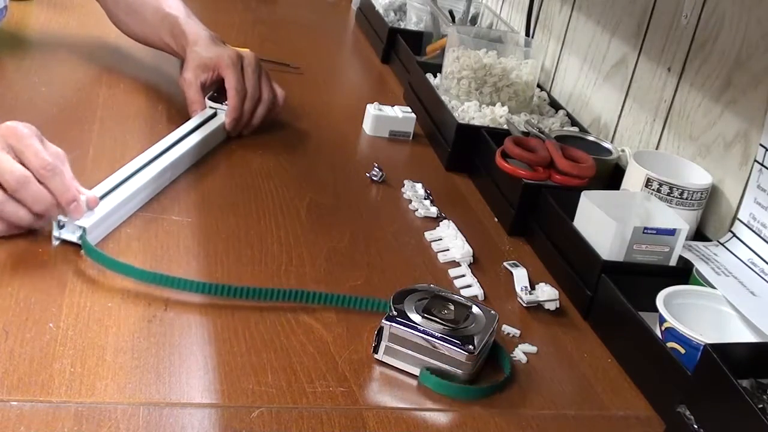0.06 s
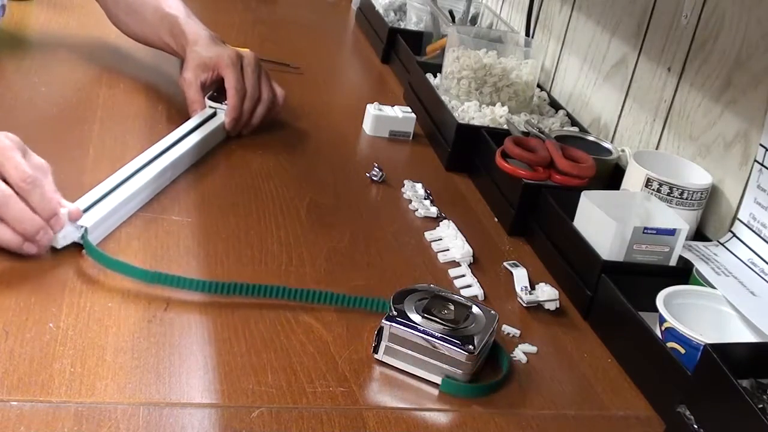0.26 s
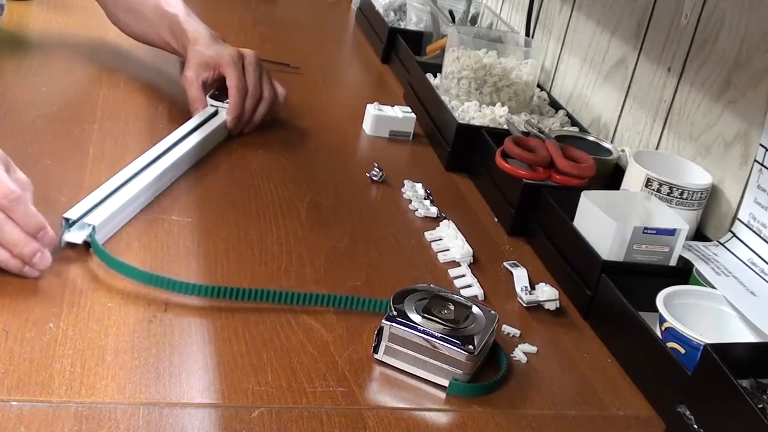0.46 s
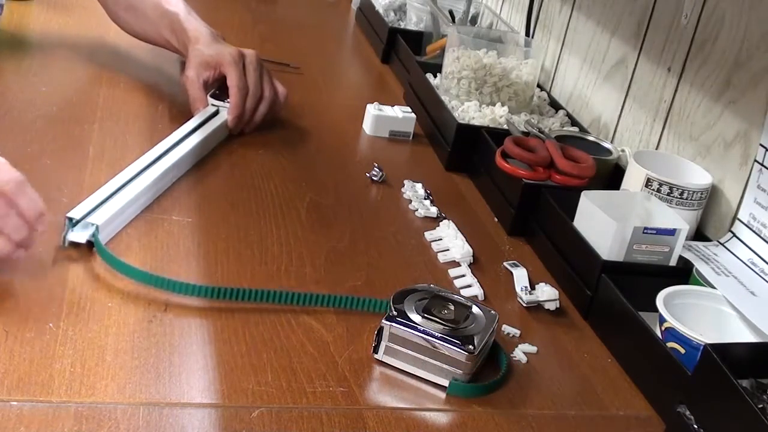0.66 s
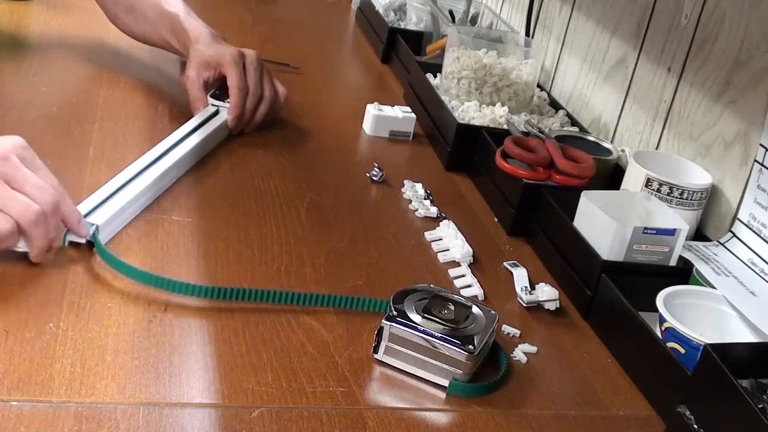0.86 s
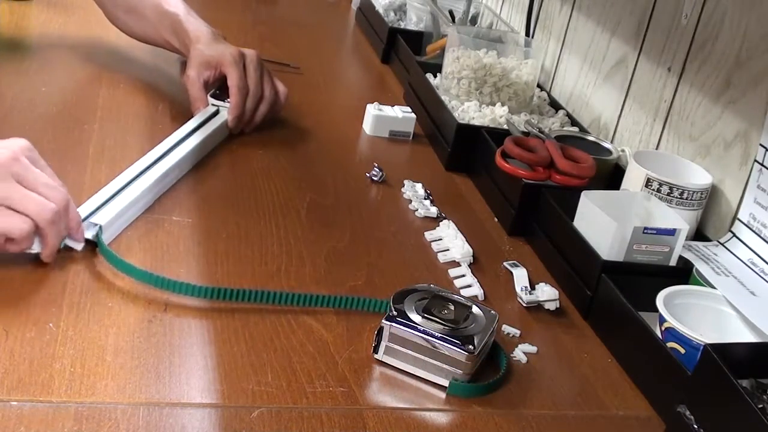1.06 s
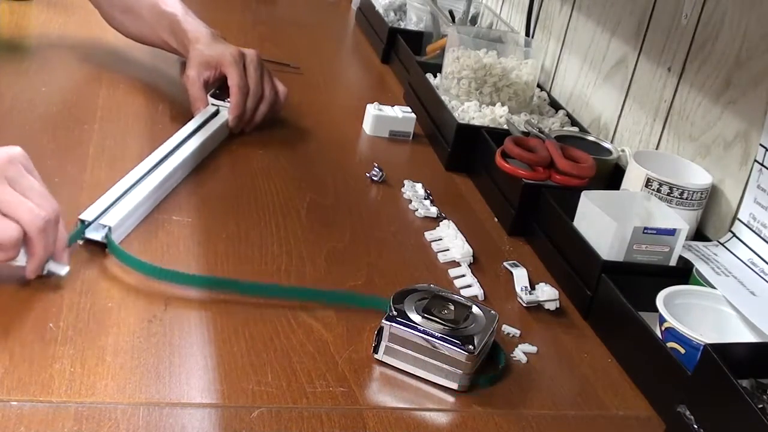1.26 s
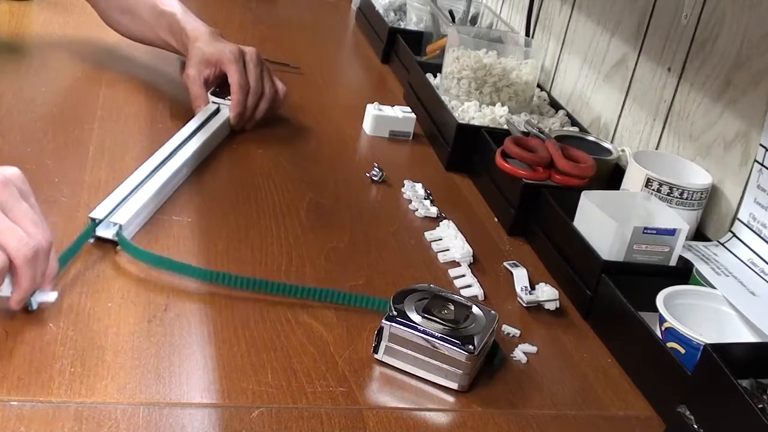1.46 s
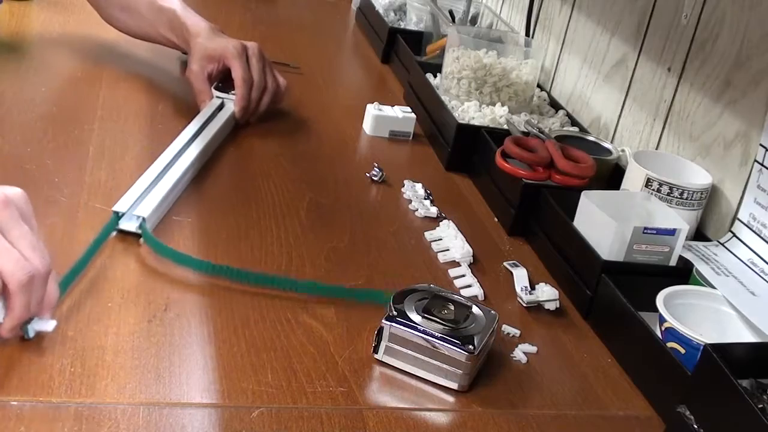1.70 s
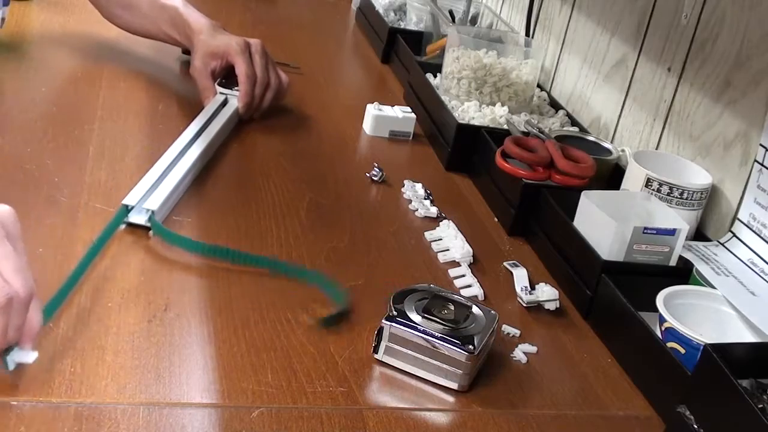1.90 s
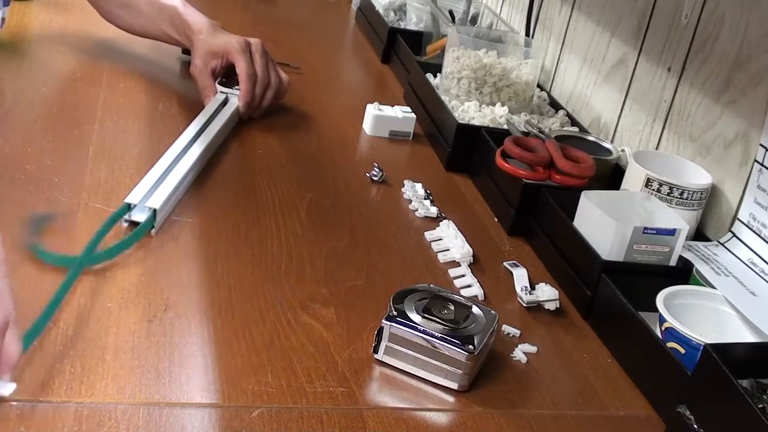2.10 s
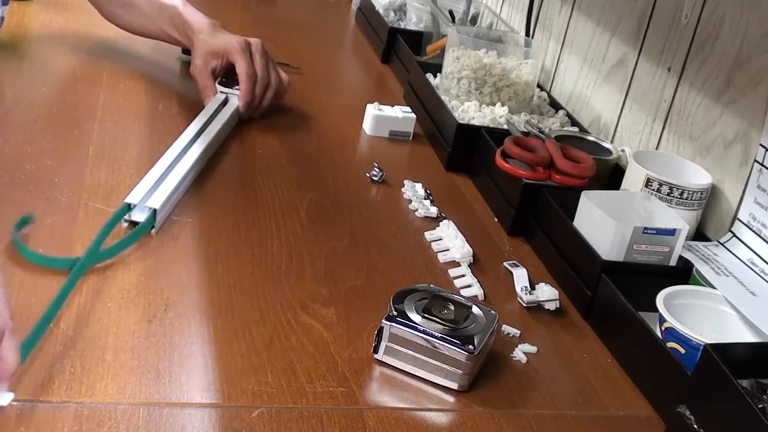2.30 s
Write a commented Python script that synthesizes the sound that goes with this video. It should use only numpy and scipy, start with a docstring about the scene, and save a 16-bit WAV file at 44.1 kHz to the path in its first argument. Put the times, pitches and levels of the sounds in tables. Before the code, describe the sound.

Close by in a quiet, faintly humming room, a belt rasps along a plastic curtain track, knocks and clicks. It then slides through with a longer, hollow scrape, ending in light slaps and soft bumps on the table.

```python
"""A toothed belt rubs through a plastic curtain track on a wooden table in a quiet room.
Dense tiny slips ring the track. The belt's end piece scrapes along, knocks and clicks out of the
mouth; a hand then pulls the belt through until its loose tail whips in and flops on the table.
Mains hum, room air and a thin whine lie behind."""
import sys
import numpy as np
from scipy import signal
from scipy.fft import rfft, irfft
from scipy.io import wavfile

SR = 44100
rng = np.random.default_rng(int(sys.argv[2]) if len(sys.argv) > 2 else 0)


def master_out(mix):
    """Clip the mix to full scale and print it as 16-bit PCM to the path in sys.argv[1]."""
    frames = np.transpose(np.atleast_2d(mix))
    ceiling = np.clip(frames, -1, 1)
    pcm = np.round(ceiling * 32767).astype(np.int16)
    wavfile.write(sys.argv[1], SR, pcm)


N = 108045
T = np.arange(N) / SR
HZ = np.fft.rfftfreq(8192, 1 / SR)


def amp(db):
    return 10 ** (np.asarray(db) / 20)


def unit_rms(x):
    return x / np.sqrt(np.mean(x ** 2) + 1e-20)


def over_hz(points, hz=HZ):
    """Table interpolated on a log-frequency axis."""
    f, value = np.transpose(points)
    return np.interp(np.log(hz + 1), np.log(f + 1), value)


def envelopes(rows):
    """One gain curve per dB column; silent outside the table."""
    times, *columns = np.transpose(rows)
    return [amp(np.interp(T, times, db, left=-120, right=-120)) for db in columns]


def colour(x, db):
    """Minimum-phase filter; gain given on HZ."""
    log_gain = np.concatenate([db, db[-2:0:-1]]) * np.log(10) / 20
    response = np.exp(np.conj(signal.hilbert(log_gain)))
    taps = np.fft.ifft(response).real[:len(HZ)]
    return signal.fftconvolve(x, taps)[:len(x)]


def drift(rate_hz):
    """Smooth random wander, unit RMS."""
    f = np.fft.rfftfreq(N, 1 / SR)
    return unit_rms(irfft(rfft(rng.standard_normal(N)) / (1 + (f / rate_hz) ** 4), N))


def fuzzy_tone(hz, width_hz):
    """Narrow noise band; its centre may move."""
    phase = 2 * np.pi * np.cumsum(hz * np.ones(N)) / SR
    return unit_rms(drift(width_hz / 2) * np.cos(phase) + drift(width_hz / 2) * np.sin(phase))


def add(mix, start_s, sound):
    part = mix[max(round(start_s * SR), 0):][:len(sound)]
    part += sound[:len(part)]


def air():
    """Soft room air and a thin whine of steady level and fluttering pitch."""
    # air spectrum: f/Hz, relative level/dB
    spectrum = [(25, -7), (170, 2), (320, -8), (1500, -11.5), (2800, -16), (4300, -10), (6100, -4),
                (7200, -12.5), (11000, -20.5), (16000, -21.5)]
    # whine tones: f/Hz, RMS flutter/Hz, level/dB
    tones = [(4384, 21.5, -60), (5852, 18.2, -54.5), (6020, 69.5, -60.5)]
    whine = np.zeros(N)
    for hz, flutter_hz, db in tones:
        phase = 2 * np.pi * np.cumsum(hz + flutter_hz * drift(rate_hz=101)) / SR
        whine += amp(db) * unit_rms(np.cos(phase))
    return whine + amp(-49) * unit_rms(colour(rng.standard_normal(N), over_hz(spectrum)))


def hum():
    """Mains hum; the level wavers by 2 dB."""
    # partials: f/Hz, level/dB
    partials = [(120, -46), (240.3, -59)]
    steady = sum(amp(db) * unit_rms(np.sin(2 * np.pi * (hz * T + rng.random()))) for hz, db in partials)
    return steady * amp(2.0 * drift(rate_hz=8.4))


def room(x):
    """Bright early reflections off things on the table, then a small room's tail."""
    # tail decay: f/Hz, T60/s
    decay = [(600, 0.47), (3000, 0.38), (9000, 0.29), (15000, 0.3)]
    tail_db, early_db, early_s = -10, -6.5, 0.0051
    t = T[:SR // 2]
    hz, frame_s, spectra = signal.stft(rng.standard_normal(len(t)), SR, nperseg=256)
    fade = 1e-3 ** (frame_s / over_hz(decay, hz)[:, None])
    tail = signal.istft(spectra * fade, SR, nperseg=256)[1][:len(t)]
    tail *= np.minimum(t / early_s, 1)
    early = rng.standard_normal(len(t)) * np.exp(-t / early_s) * (t > .001)
    early = signal.sosfilt(signal.butter(2, 1200, "high", fs=SR, output="sos"), early)
    response = amp(tail_db) * tail / np.linalg.norm(tail) + amp(early_db) * early / np.linalg.norm(early)
    return signal.fftconvolve(x, response)[:N]


def table_bumps():
    """Hands, track and belt bump the table top softly."""
    # bumps: t/s, level/dB, f/Hz, decay/s
    bumps = [(0.017, -35, 148, 0.016), (0.425, -31, 116, 0.023), (.843, -33.5, 138, .02),
             (1.041, -49, 171, 0.021), (2.029, -43.5, 85.8, 0.14), (2.175, -33, 153.5, 0.033),
             (2.227, -38.5, 98.5, 0.077)]
    rise_s = .006
    swell = 1 - np.exp(-(T / rise_s) ** 2)
    out = np.zeros(N)
    for start_s, db, hz, decay_s in bumps:
        add(out, start_s, amp(db) * swell * np.exp(-T / decay_s) * np.sin(2 * np.pi * hz * T))
    return out


def track_db():
    """The track's response to whatever shakes it."""
    # resonances and notches: f/Hz, width/Hz, gain/dB
    resonances = [(595.5, 25, 7.5), (665, 25, 5.5), (1536, 18, 6), (1714, 260, -4.5), (2627, 105, -6.5),
                  (2800, 51, 1.5), (3258, 57, 5), (3670, 260, -2), (4130, 360, 3.5), (4910, 140, -2),
                  (6104, 130, 6), (6215, 122, 6.5), (6710, 150, 5), (8520, 60, 5.5), (8930, 48, 1.5),
                  (10800, 170, 6.5), (11380, 64, 7.5)]
    return sum(db / (1 + (2 * (HZ - hz) / width_hz) ** 2) for hz, width_hz, db in resonances)


def rub(spectrum):
    """A dense, juddering train of tiny slips rings the track; unit RMS."""
    slips_per_s, spread_db, judder_db = 7000, 2, 1
    emphasis = 1.295  # rubbing brings out the resonances more than a click does
    slips = (rng.random(N) < slips_per_s / SR) * rng.choice([-1, 1], N)
    size_db = spread_db * np.minimum(rng.exponential(1, N), 5) + judder_db * drift(rate_hz=68.4)
    return unit_rms(colour(slips * amp(size_db), over_hz(spectrum) + emphasis * track_db()))


def run_out():
    """The fast belt makes the track sing; a faint zip sinks as its tail runs through."""
    # singing track: t/s, level/dB
    sing_levels = [(1.66, -68), (1.8, -44.5), (1.97, -48), (2.1, -62)]
    # zip: t/s, f/Hz, level/dB
    zip_path = [(1.84, 4500, -63), (1.989, 3950, -50), (2.07, 3670, -62)]
    times, hz, db = np.transpose(zip_path)
    zip_gain, = envelopes(np.transpose([times, db]))
    sing_gain, = envelopes(sing_levels)
    zip_tone = fuzzy_tone(np.interp(T, times, hz), width_hz=300)
    return zip_gain * zip_tone + sing_gain * fuzzy_tone(6050, width_hz=260)


def snap_ring(x):
    """The thin ring that a click leaves in the belt's end piece."""
    # modes: f/Hz, gain/dB
    modes = [(3348, 12), (4850, 8), (6132, 4), (9087, 11)]
    t, t60_s = T[:len(HZ)], 0.16
    fade = 1e-3 ** (t / t60_s)
    tones = sum(amp(db) * np.cos(2 * np.pi * hz * t) for hz, db in modes)
    return signal.fftconvolve(x, tones * 2 * fade / fade.sum())[:N]


def clicks():
    """Plastic edges snap past each other; each crack rings the track."""
    # snaps: t/s, energy/dB, centre/Hz, width/octaves, decay/ms
    snaps = [(0.3682, -57, 5000, 1, 6.7), (.451, -58, 11900, 0.88, 3), (0.452, -50, 3060, 0.53, 0.27),
             (0.4543, -47, 9520, 0.13, 6.4), (0.4688, -50, 4900, 0.8, 8.6), (0.473, -56.5, 590, 0.76, 60),
             (0.4746, -41.5, 5860, 0.38, 3.6), (0.4772, -46, 6840, 0.65, 4),
             (1.334, -58.5, 7500, 0.17, 5.6), (1.4003, -58.5, 8400, 0.17, 2.4)]
    body_db, low_hz, high_hz = -12, 247, 4700
    body = amp(body_db) / (1 + (HZ / high_hz) ** 4) * HZ / (HZ + low_hz)
    out, t = np.zeros(N), T[:len(HZ)]
    for start_s, db, hz, octaves, decay_ms in snaps:
        crack = rng.standard_normal(len(t)) * np.exp(-t * 1000 / decay_ms)
        band = np.exp(-.5 * (np.log2((HZ + 1) / hz) / octaves) ** 2)
        click = colour(crack, 20 * np.log10(band + body + 1e-4) + track_db())
        add(out, start_s, amp(db) * unit_rms(click) / np.sqrt(t[-1]))
    return out + snap_ring(out)


def knock():
    """The end piece knocks in the track's hollow mouth; close modes beat."""
    # mouth modes: f/Hz, relative level/dB, T60/s
    modes = [(1126, -1.5, 0.065), (1310, -11, 0.038), (1128, -20, 0.14), (1305, -16, 0.26)]
    start_s, rise_s, gain_db = .3728, 0.00089, -19.5
    out, t = np.zeros(N), T[:len(HZ)]
    ring = sum(amp(db) * 1e-3 ** (t / t60_s) * np.cos(2 * np.pi * hz * t) for hz, db, t60_s in modes)
    add(out, start_s, amp(gain_db) * ring * np.minimum(t / rise_s, 1))
    return out


def slaps():
    """The belt slaps the track: a short scrape of teeth and a low ring of the wall."""
    # slaps: t/s, scrape level/dB, ring level/dB, decay/ms
    hits = [(1.362, -68, -35.5, 44), (1.515, -39, -35.5, 15), (1.912, -57, -32.5, 29),
            (2.119, -35, -33.5, 16), (2.133, -30.5, -29, 15), (2.147, -49, -44, 13),
            (2.171, -35, -30.5, 3.7), (2.218, -60, -36, 2.5)]
    # scrape spectrum: f/Hz, relative level/dB
    spectrum = [(350, -9.5), (700, 0.5), (2600, -6.5), (6500, -12), (9000, -16.5), (14000, -45)]
    wall_hz, wall_decay_s = 617, 0.0056
    wall, scrape_gain, t = np.zeros(N), np.zeros(N), T[:2 * len(HZ)]
    for start_s, scrape_db, ring_db, decay_ms in hits:
        contact = np.exp(-t * 1000 / decay_ms)
        add(scrape_gain, start_s, amp(scrape_db) * contact)
        swell = signal.lfilter([1], [1, -np.exp(-1 / (wall_decay_s * SR))], contact)
        hz = wall_hz * (1 + 0.013 * rng.standard_normal())
        add(wall, start_s, amp(ring_db) * swell / swell.max() * np.sin(2 * np.pi * hz * t))
    return wall + scrape_gain * rub(spectrum)


def sliding():
    """The belt scrapes in, then is pulled out with a hiss over the track's hollow rumble."""
    # push scrape; end piece rasping near the mouth: t/s, level/dB
    push_levels = [(0, -50.5), (.08, -44), (.41, -43.5), (.45, -48.5)]
    rasp_levels = [(0, -54.5), (.225, -47.5), (.245, -37), (.265, -48), (.282, -38), (.307, -35),
                   (.32, -45), (.36, -39), (.39, -41), (.43, -76)]
    # grip and pull: t/s, hiss level/dB, rumble level/dB
    pull_levels = [(.94, -74, -56), (1.0, -48, -61), (1.05, -82, -75), (1.112, -53, -57),
                   (1.135, -44, -44.5), (1.19, -45, -53.5), (1.28, -38.5, -41), (1.41, -38.5, -49),
                   (1.44, -41, -46.5), (1.6, -45.5, -41.5), (1.72, -41, -38.5), (1.9, -41.5, -39),
                   (2.0, -41.5, -44), (2.105, -51, -41.5), (2.18, -47.5, -40), (2.25, -66, -59.5),
                   (2.36, -79, -80)]
    # rubbing spectra: f/Hz, relative level/dB
    push_spectrum = [(150, -26), (400, 7), (1300, -1.5), (3000, 1), (7200, 0), (10500, -10), (14000, -24)]
    rasp_spectrum = [(400, -33), (1100, -1), (1900, -1), (2600, -7.5), (12000, -48)]
    hiss_spectrum = [(200, -39), (900, 0), (4500, -1), (7000, -2), (9000, -8), (11000, -12), (12500, -18.5),
                     (16000, -37)]
    rumble_spectrum = [(60, -29), (150, 0.5), (260, 5), (310, -7.5), (450, 2.5), (1100, -4.5),
                       (1800, -10.5), (12000, -30)]
    push_gain, = envelopes(push_levels)
    rasp_gain, = envelopes(rasp_levels)
    hiss_gain, rumble_gain = envelopes(pull_levels)
    push = push_gain * rub(push_spectrum) + rasp_gain * rub(rasp_spectrum)
    pull = hiss_gain * rub(hiss_spectrum) + rumble_gain * rub(rumble_spectrum)
    return push + pull


def scene():
    """Belt and track straight ahead; only reflections, air and whine differ between channels."""
    # side-channel filter: f/Hz, gain/dB
    width = [(100, -13.5), (600, 4), (2000, 2.5), (9000, -4.5), (12500, -34)]
    belt = sliding() + run_out() + clicks() + knock() + slaps()
    mid = belt + room(belt) + table_bumps() + hum() + air()
    side = colour(0.31 * room(belt) + 0.37 * air(), over_hz(width))
    return np.array([mid + side, mid - side])


def record(dry):
    """Steep low-pass at 15.9 kHz."""
    taps = signal.firwin(511, 15900, window=("kaiser", 9), fs=SR)
    return signal.oaconvolve(dry, taps[None], "same", axes=1)


dry = scene()
out = record(dry)
master_out(out)
```